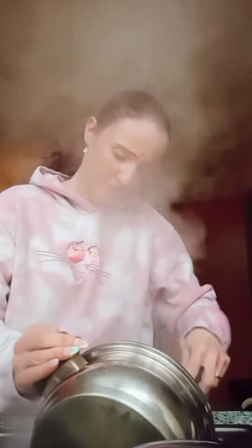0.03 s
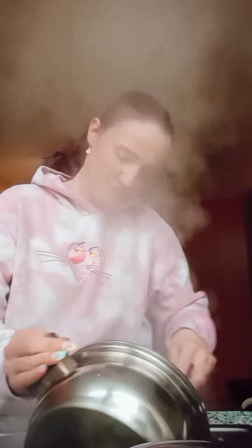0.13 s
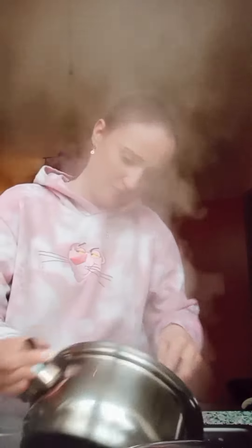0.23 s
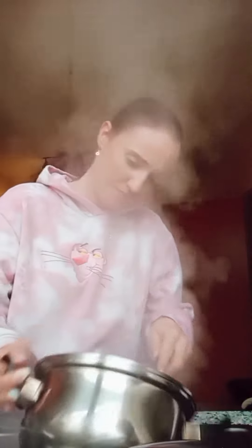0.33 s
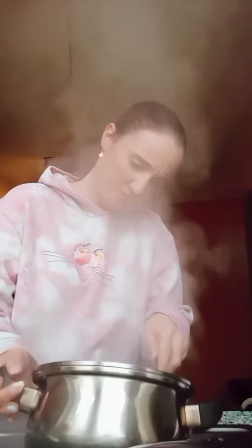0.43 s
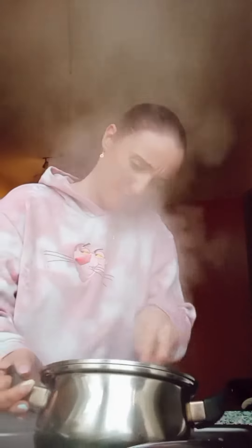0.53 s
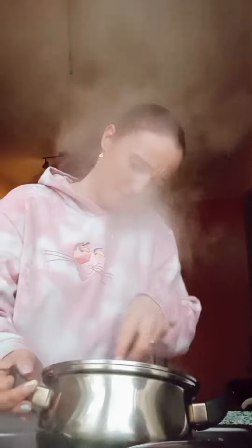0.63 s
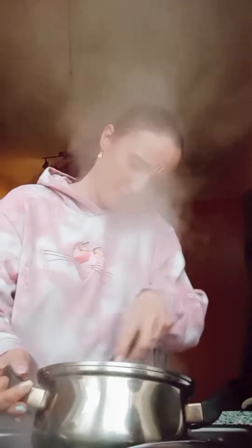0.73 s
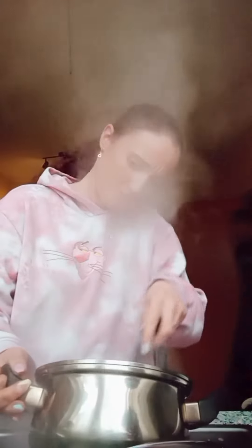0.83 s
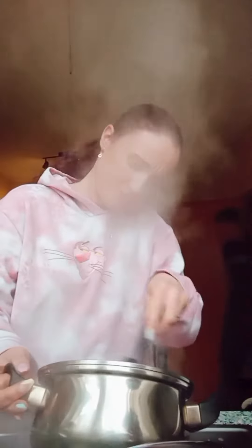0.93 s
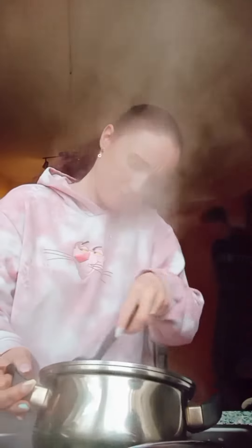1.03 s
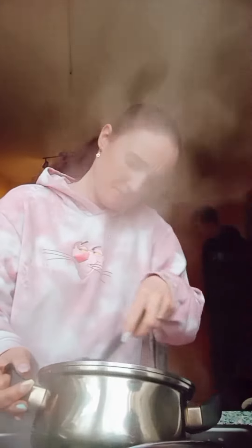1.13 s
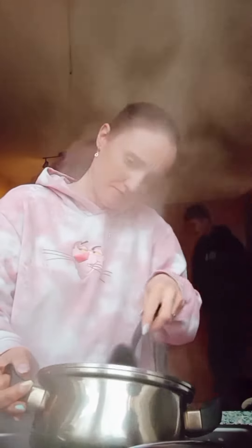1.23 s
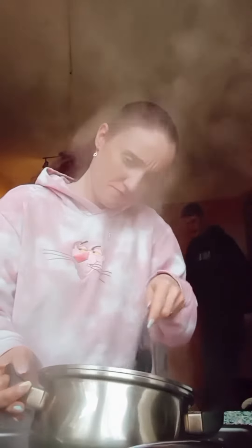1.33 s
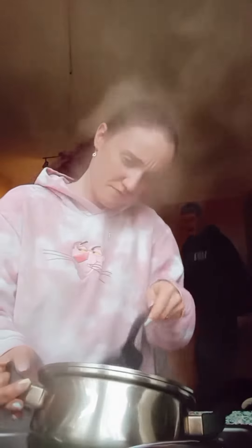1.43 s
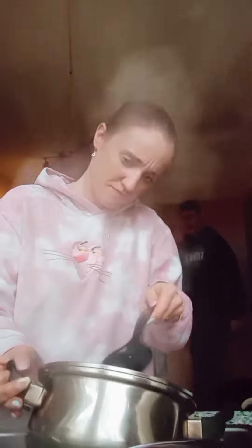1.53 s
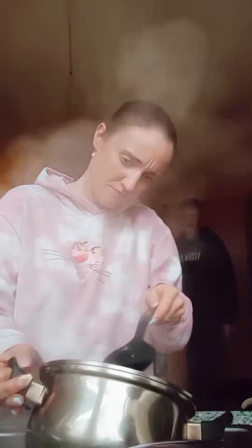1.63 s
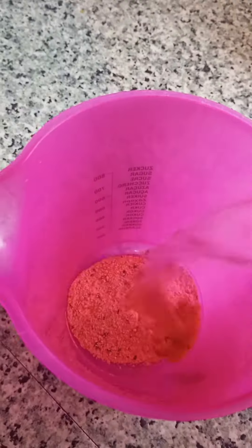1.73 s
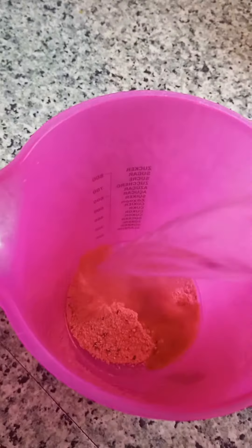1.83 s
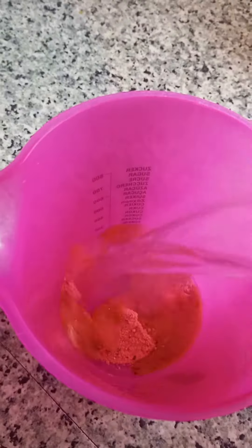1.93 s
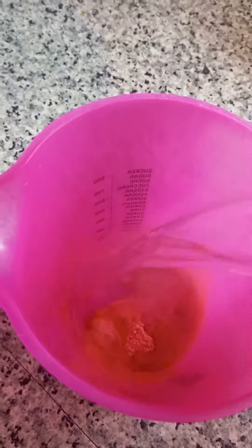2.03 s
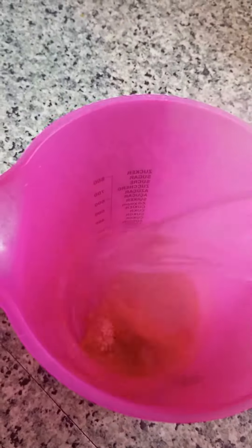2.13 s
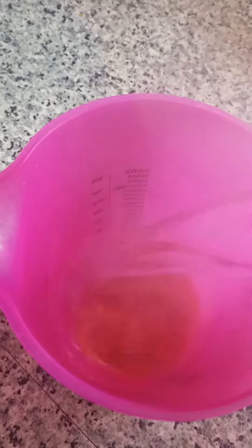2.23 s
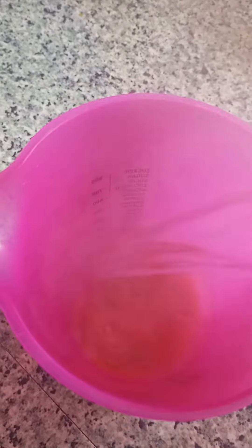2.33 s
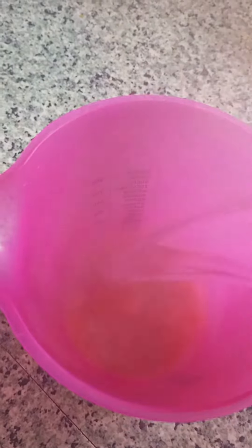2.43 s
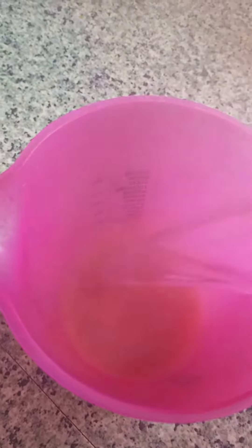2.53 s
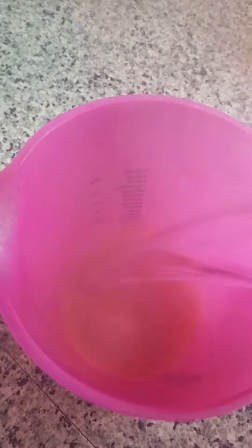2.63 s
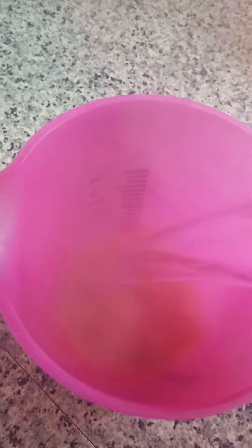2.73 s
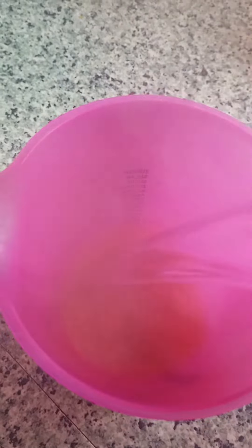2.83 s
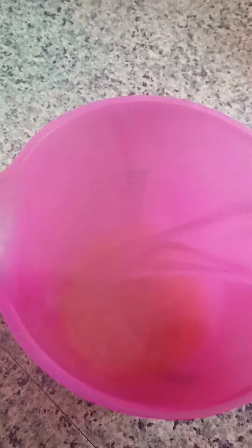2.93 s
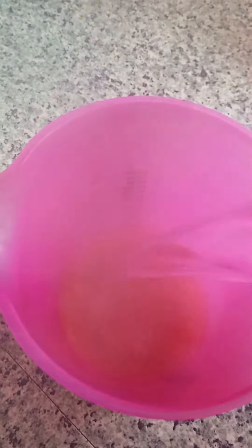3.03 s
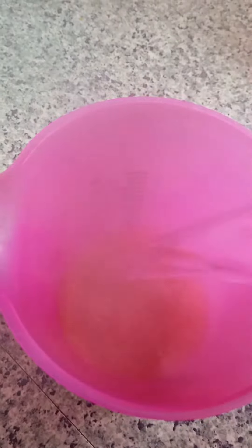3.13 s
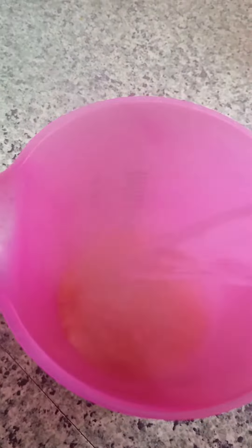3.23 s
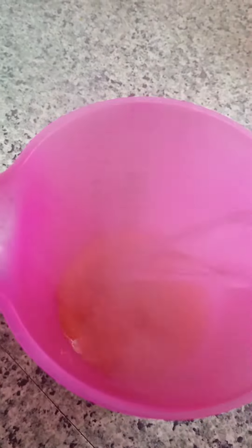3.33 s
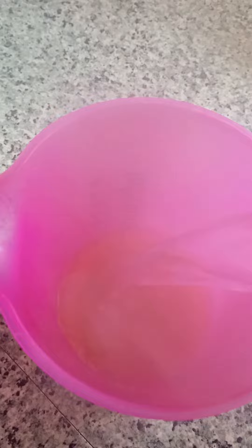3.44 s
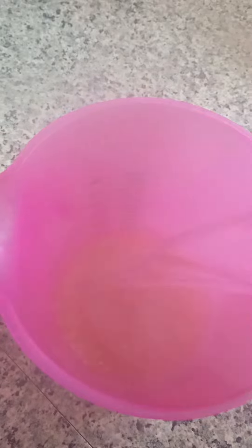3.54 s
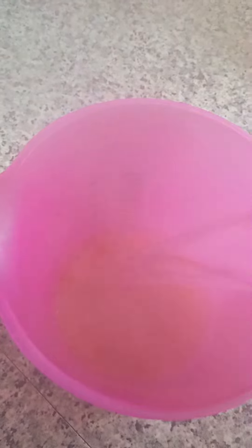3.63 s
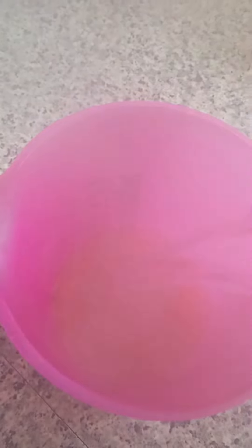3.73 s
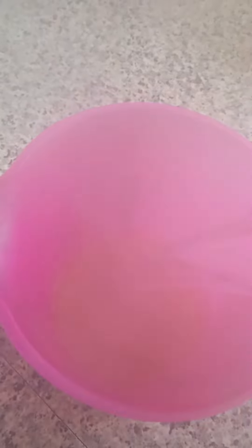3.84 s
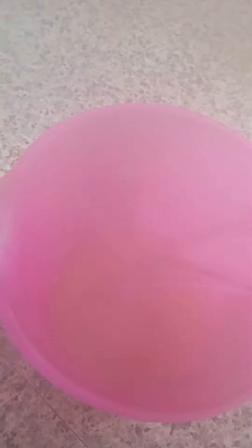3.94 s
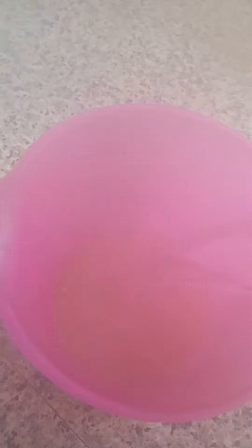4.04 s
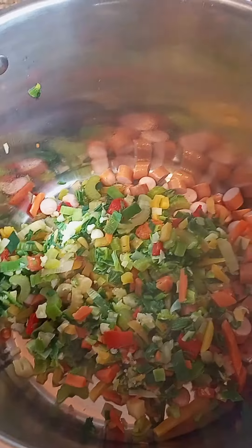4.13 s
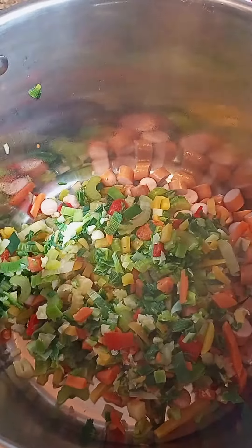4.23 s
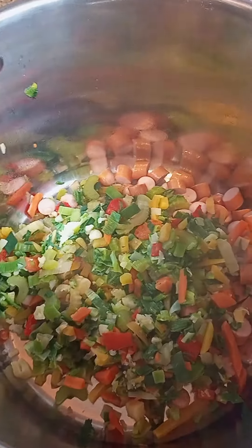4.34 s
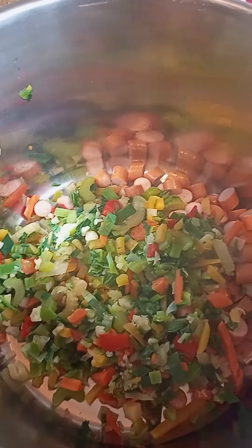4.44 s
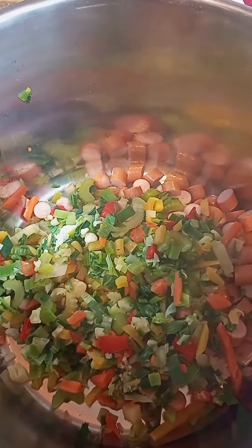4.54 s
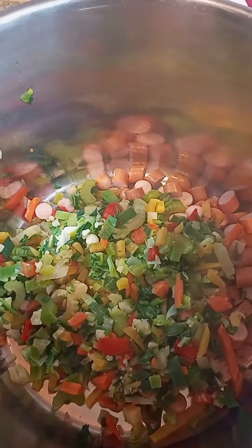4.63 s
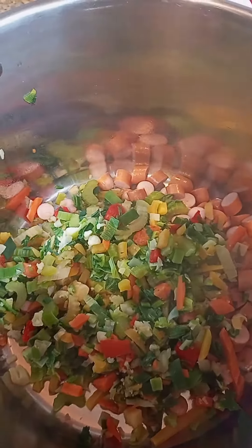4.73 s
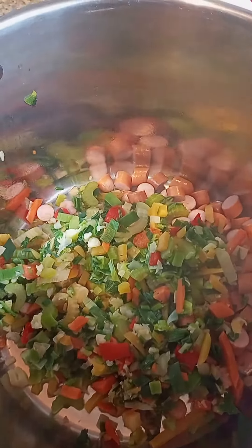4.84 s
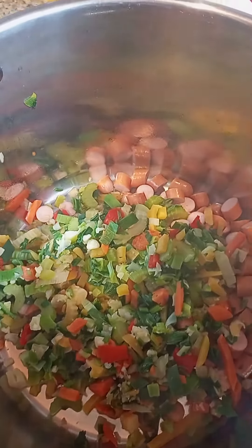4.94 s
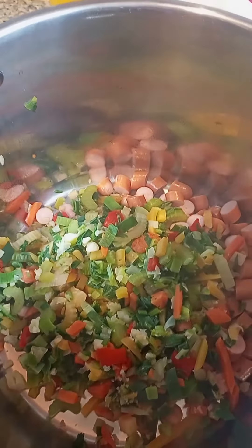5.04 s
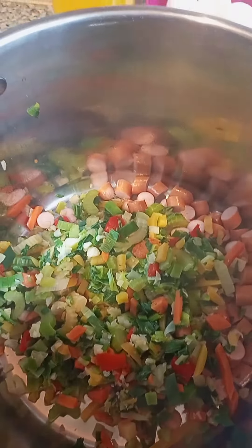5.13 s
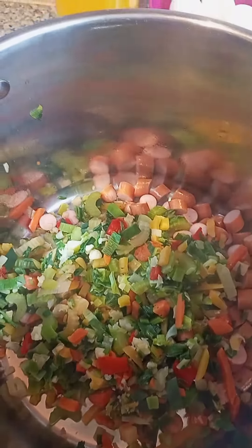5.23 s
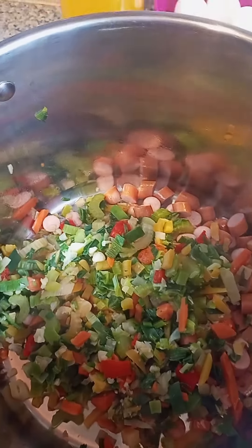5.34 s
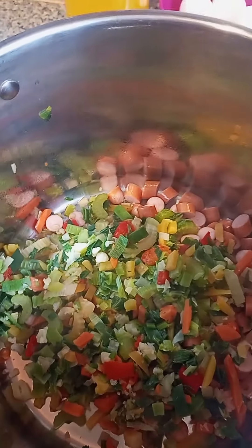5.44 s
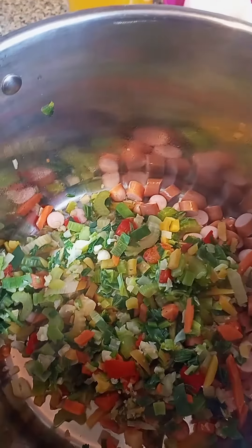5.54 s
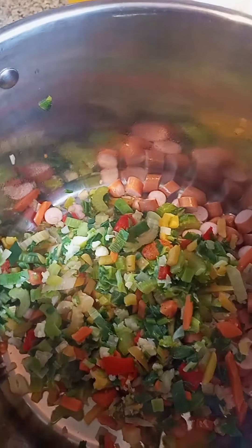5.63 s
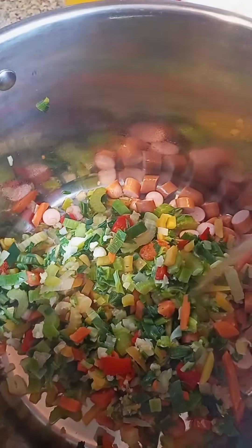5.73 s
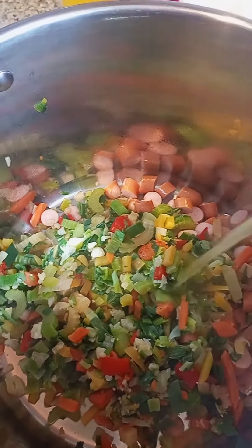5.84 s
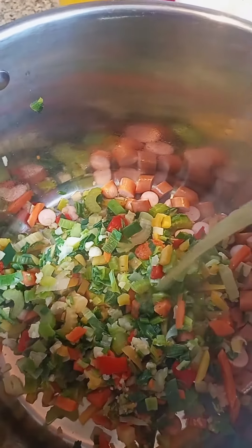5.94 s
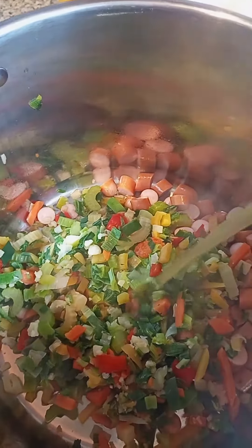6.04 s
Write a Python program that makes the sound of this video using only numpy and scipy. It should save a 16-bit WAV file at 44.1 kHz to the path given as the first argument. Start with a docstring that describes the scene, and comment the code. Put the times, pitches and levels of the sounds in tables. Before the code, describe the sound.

Steel pot scuffs and clanks onto a stove, a utensil rings its rim, water gurgles into a plastic jug, then a fluttering roar with simmering bubbles.

```python
"""Home kitchen in three shots

An extractor fan (coloured noise and a wavering hum) runs in each shot, with a brief silence between shots.
A steaming pot (hissing noise) scuffs and lands on the hob, then a utensil strikes it: ringing modes and cracks.
Hot water is poured onto powder in a plastic jug: bursts of clicks and rising bubble notes, glugs and drops.
Then a burner roars (fluttering noise) under a pot of vegetables, with simmering bubbles and a clicking sizzle.
"""
import sys
import numpy as np
from scipy import signal
from scipy.fft import rfft, irfft, next_fast_len
from scipy.io import wavfile
from scipy.ndimage import uniform_filter1d

SR = 44100
rng = np.random.default_rng(int(sys.argv[2]) if len(sys.argv) > 2 else 0)


def master_out(mix):
    """Clip the mix to full scale and print it as 16-bit PCM to the path in sys.argv[1]."""
    frames = np.transpose(np.atleast_2d(mix))
    ceiling = np.clip(frames, -1, 1)
    pcm = np.round(ceiling * 32767).astype(np.int16)
    wavfile.write(sys.argv[1], SR, pcm)


N = 268128
TIME = np.arange(N) / SR
SIZE = next_fast_len(N + SR, True)
FREQ = np.maximum(np.arange(SIZE // 2 + 1) * SR / SIZE, 1)
ROOM_T60_S = 0.47


def amp(db):
    """Decibels to gain."""
    return 10 ** (np.asarray(db) / 20)


def unit(x):
    """Scale to rms 1."""
    return x / np.sqrt(np.mean(x ** 2))


def noise():
    """White noise."""
    return rng.standard_normal(N)


def walk(rate):
    """Smooth random drift with rms 1, heading for a new value rate times a second."""
    k = max(int(SR / rate), 1)
    steps = np.repeat(rng.standard_normal(N // k + 1), k)
    return unit(uniform_filter1d(steps, k)[:N])


def colour(x, points, lifts=()):
    """Minimum-phase filter of unit power through (f/Hz, level/dB) points, with lifts (f/Hz, width/Hz, lift/dB)."""
    hz, db = np.transpose(points)
    db = np.interp(np.log(FREQ), np.log(hz), db)
    for f, width, lift in lifts:
        db = db + lift / (1 + (2 * (FREQ - f) / width) ** 2)
    # folding the cepstrum forward in time makes the filter causal
    cepstrum = irfft(np.log(unit(amp(db))), SIZE)
    cepstrum[1:SIZE // 2] *= 2
    cepstrum[SIZE // 2 + 1:] = 0
    return irfft(rfft(x, SIZE) * np.exp(rfft(cepstrum)), SIZE)[:N]


def resonate(x, modes):
    """Parallel resonant band-passes (f/Hz, width/Hz, level/dB)."""
    response = sum(amp(db) / (1 + 1j * (FREQ - f * f / FREQ) / width) for f, width, db in modes)
    return irfft(rfft(x, SIZE) * response, SIZE)[:N]


def fade(t60):
    """One second of exponential decay, falling 60 dB in t60 seconds."""
    return amp(-60 * TIME[:SR] / t60)


def ramp(start, length):
    """Rise from 0 to 1, beginning at start."""
    return np.clip((TIME - start) / length, 0, 1)


def swell(s, length):
    """A smooth bump centred on s."""
    return np.exp(-2 * ((TIME - s) / length) ** 2)


def envelope(events, attack, t60):
    """Level of (t/s, level/dB) events that each rise briefly and die away; overlaps add in power."""
    power = np.zeros(N)
    for s, db in events:
        decay = 1e-6 ** (np.maximum(TIME - s - attack, 0) / t60)
        power += (amp(db) * ramp(s, attack)) ** 2 * decay
    return np.sqrt(power)


def come_up(full_s, rise_db_per_s, sag_db_per_s):
    """Gain that climbs to 1 at full_s and then sags slowly."""
    early = np.maximum(full_s - TIME, 0)
    late = np.maximum(TIME - full_s, 0)
    return amp(-rise_db_per_s * early - sag_db_per_s * late)


def add(out, s, sound):
    """Mix a sound in at time s."""
    part = out[int(s * SR):][:len(sound)]
    part += sound[:len(part)]


def patter(rate, spread_db):
    """Random clicks of either sign, many small and a few big, with rms 1."""
    size = amp(spread_db * np.minimum(rng.exponential(size=N), np.pi + 1))
    return unit((rng.random(N) < rate / SR) * np.sign(noise()) * size)


def blips(rows, sag=0):
    """Short smooth tones (t/s, level/dB, f/Hz, length/s) whose pitch may sag, in octaves a second."""
    out = np.zeros(N)
    for s, db, hz, length in rows:
        age = TIME - s
        out += amp(db) * swell(s, length) * np.cos(2 * np.pi * hz * age * 2 ** (-sag * age / 2))
    return out


def room(x, wet_db, treble_db):
    """Adds the kitchen's diffuse tail: decaying noise with a quick build-up."""
    tail = rng.standard_normal(SR) * fade(ROOM_T60_S) * (1 - fade(0.016))
    wet = signal.fftconvolve(x, tail / np.linalg.norm(tail))[:N]
    return x + amp(wet_db) * colour(wet, [(3000, 0.016), (11000, treble_db)])


def fan(hum_db):
    """Low rush of air with a hum that wavers in pitch."""
    # extractor fan and room: f/Hz, relative level/dB
    fan_colour = [(25, -31.5), (50, -10.5), (70, -1.5), (104, 5), (130, -2), (200, -7.5), (295, -1),
                  (470, -13), (1150, -16.5), (1900, -28.5), (5000, -45), (9000, -60)]
    hum = np.sin(2 * np.pi * np.cumsum(104 * (1 + 0.033 * walk(18))) / SR)
    rush = colour(noise(), fan_colour) * amp(walk(12))
    return amp(-43) * rush + amp(hum_db) * hum


def pot():
    """The pot scuffs, knocks, squeaks and lands with a bounce; then a utensil strikes its rim."""
    # pot meeting the hob: t/s, relative level/dB
    pot_blows = [(.596, 4.5), (.5975, -4), (.6225, -6), (.631, -6)]
    # its damped base: f/Hz, relative level/dB, t60/s
    pot_modes = [(523, -10, 0.4), (654, -11, 0.088), (762, -3, 0.17), (910, -11.5, 0.023), (1324, -8, 0.2),
                 (2380, -11, 0.33), (2530, -6, 0.11), (3440, 0, 0.071), (5910, 1, 0.017),
                 (6140, -9.5, .018)]
    # landing's contact noise: f/Hz, relative level/dB
    pot_crack = [(100, -11.5), (300, -12.5), (520, 1.5), (900, -2), (1900, -11.5), (2600, -9.5),
                 (4400, -15), (5900, -10.5), (7200, -15.5), (7900, -22.5), (9800, -16.5), (13500, -37)]
    # utensil on the steel rim: t/s, relative level/dB
    rim_blows = [(1.1095, 0.5), (1.1122, 2.5)]
    # the rim's damped clack, then its long ring: f/Hz, relative level/dB, t60/s
    rim_modes = [(520, -16, .06), (1010, -13, .06), (1345, -7, .05), (1710, -3, .04), (2630, 3, .04),
                 (3110, -5, .04), (3500, -2, .035), (1346, -11, .42), (1830, -18, .42), (2073, -15, .38),
                 (2108, -5.5, .34), (2450, -15, .35), (2510, -14, .4), (2659, -14, .33), (2750, -15, .4),
                 (3490, -20, .38)]
    # utensil's contact noise: f/Hz, relative level/dB
    rim_crack = [(150, -55), (500, -8), (950, -10.5), (1350, -1.5), (1560, -15), (1720, -2), (2150, -11.5),
                 (2600, -4), (3500, -7), (4500, -15), (6500, -9.5), (7800, -21.5), (9500, -13.5),
                 (13500, -34.5)]
    # pot and hand scuffing on the hob: t/s, level/dB, length/s
    scuff_moments = [(0.066, -44.5, 0.024), (0.44, -44.5, 0.016), (0.905, -40.5, 0.04),
                     (0.907, -38.5, 0.005), (1.485, -48, 0.035), (1.59, -48, 0.02)]
    # tone of the rubbing: f/Hz, relative level/dB
    scuff_colour = [(150, -17), (400, -3.5), (800, -1), (1250, -5), (1700, -13), (3000, -20.5), (5000, -42),
                    (14000, -51.5)]
    # soft knocks of handling: t/s, level/dB, f/Hz, length/s
    knocks = [(0.075, -40.5, 1300, 0.013), (.062, -35, 380, 0.016), (.44, -41.5, 1270, 0.011),
              (1.592, -39.5, 1050, 0.016), (1.082, -31, 81, 0.011)]
    # steel squeaks as the pot tilts: t/s, level/dB, f/Hz, length/s
    squeaks = [(.126, -46.5, 2593, 0.037)]

    landing = clank(pot_blows, pot_modes, pot_crack, ring_db=-16.0, crack_db=-16.0, crack_t60=0.033,
                    tail_db=-16.5)
    strike = clank(rim_blows, rim_modes, rim_crack, ring_db=-11.5, crack_db=-15.5, crack_t60=0.02,
                   tail_db=-17.5)
    sliding = amp(-55 + 3.9 * walk(25))
    rubbing = sliding + sum(amp(db) * swell(s, length) for s, db, length in scuff_moments)
    scuffs = colour(patter(rate=2200, spread_db=2) * rubbing, scuff_colour)
    squeaking = blips(squeaks, sag=1.7) * amp(2 * walk(200))
    handling = scuffs + blips(knocks) + squeaking
    return landing + strike + room(handling, wet_db=-5.5, treble_db=-3.5)


def clank(blows, modes, crack_colour, ring_db, crack_db, crack_t60, tail_db):
    """The hardest blow rings the steel, roughened by rattling; every contact cracks and fills the room."""
    hardest = max(blows, key=lambda blow: blow[1])[0]
    ring = np.zeros(N)
    for k, (hz, db, t60) in enumerate(modes):
        add(ring, hardest, (-1) ** k * amp(db) * mode(hz, t60))
    rattle = amp(2.4 * walk(150) * ramp(hardest, .03))
    ring = room(ring * rattle, wet_db=-13, treble_db=-4)
    crack = noise() * envelope(blows, 1 / SR, crack_t60)
    tail = colour(noise(), [(3000, 0), (11000, -8)]) * envelope(blows, .01, ROOM_T60_S)
    return amp(ring_db) * ring + amp(crack_db) * colour(crack + amp(tail_db) * tail, crack_colour)


def mode(hz, t60):
    """A short mode of the steel just decays; a long one builds up and beats with a close twin."""
    turn = 2 * np.pi * TIME[:SR]
    if t60 < .2:
        return fade(t60) * np.sin(hz * turn)
    twin_hz = hz + 30 * rng.choice([-1, 1]) * rng.uniform(0.42, 1)
    pair = np.sin(hz * turn) + amp(-10) * np.sin(twin_hz * turn)
    return fade(t60) * (1 - fade(t60)) * pair


def steam():
    """A soft, faint hiss from the hot pot, swelling in puffs."""
    # puffs of steam: t/s, level/dB
    puffs = [(.03, -57), (.215, -50), (.45, -59), (.89, -50.5), (1.485, -57.5)]
    # hiss: f/Hz, relative level/dB
    steam_colour = [(800, -12.5), (2000, 0.5), (3500, 8.5), (4600, 1.5), (6200, 2.5), (7800, -8.5),
                    (10000, -2.5), (12000, -12), (14000, -21)]
    level = np.hypot(amp(-62.5), envelope(puffs, attack=0.017, t60=.7))
    return level * amp(1.0 * walk(27)) * colour(noise(), steam_colour)


def pour():
    """The stream breaks into bursts of droplets and churns up bubbles that ring in the jug."""
    # All levels here are ahead of the pour's final trim and tone.
    # splashes thrown up the jug's wall: t/s, level/dB
    splashes = [(1.86, -43.5), (2.205, -46), (3.275, -39.5), (3.925, -42)]
    # droplets: f/Hz, relative level/dB
    spatter_colour = [(400, -12), (1200, -10.5), (1700, 6.5), (2100, -2.5), (2700, 1.5), (3100, -5.5),
                      (4000, -2), (6000, -44), (7500, -33.5)]
    # fine spray: f/Hz, relative level/dB
    spray_colour = [(1500, -7), (3100, -10.5), (3850, 7.5), (4500, 3), (5600, -2), (6300, -1.5),
                    (14000, -22.5)]
    # air in the jug: f/Hz, width/Hz, relative level/dB
    jug_air = [(268.5, 32, 3.5), (359, 57, -2.5), (616, 135, 1.5), (887, 32, 2)]
    # the jug's higher resonances: f/Hz, width/Hz, lift/dB
    jug_upper = [(2210, 110, 10.5), (2390, 77, 9)]
    # low gulps of big air pockets once the jug is deep: t/s, level/dB
    gulps = [(3.866, -28), (3.889, -24.5), (3.92, -29), (3.961, -27.5), (3.986, -25), (4.045, -23.5)]
    # glugs, where the stream drags a cluster of bubbles under: t/s, level/dB, f/Hz, length/s
    glugs = [(1.81, -46.5, 858, .09), (2.085, -38, 876, .022), (2.204, -32, 863, .028),
             (2.569, -32.5, 802, 0.05), (2.715, -34.5, 900, 0.029), (2.834, -38, 612, .04),
             (2.917, -38, 676, .04), (3.093, -41.5, 603, 0.061), (3.225, -41.5, 786, 0.056),
             (3.318, -40.5, 613, .04), (3.377, -37, 830, .028), (3.502, -38.5, 327, .025),
             (3.763, -40.5, 790, 0.027), (3.877, -35.5, 884, 0.074)]
    # big drops slapping the plastic: t/s, peak level/dB, f/Hz, t60/s
    drops = [(2.057, -31.5, 4100, 0.021), (2.2079, -8, 2770, 0.006), (2.254, -20, 4000, 0.017),
             (2.37, -26, 3900, 0.014), (2.428, -22.5, 2400, 0.017), (2.443, -25, 2330, 0.018),
             (2.646, -26, 4370, 0.029), (2.758, -26, 1760, 0.046), (2.798, -21.5, 2080, 0.0073),
             (2.907, -20, 2470, 0.011), (2.979, -30, 4300, 0.013), (3.0154, -22.5, 2190, 0.018),
             (3.412, -33, 4200, .012), (4.073, -19, 1260, 0.0038)]
    # dull top of the whole pour: f/Hz, relative level/dB
    pour_top = [(5700, 2.5), (6400, -7), (7300, -22), (11000, -8.5), (14000, -31)]
    full_flow_s, deep_s = 2.4, 2.56

    # the stream swells to full flow and sags slowly; then the deepening water cushions it
    cushioned = amp(-40.5 - 7.5 * ramp(3.04, 0.17))
    stream = cushioned * come_up(full_flow_s, rise_db_per_s=34, sag_db_per_s=1.5)
    splashing = np.hypot(stream, envelope(splashes, attack=0.0079, t60=0.3))
    burst = amp(2.6 * np.tanh(walk(90)) + 1.8 * np.tanh(walk(22)))

    droplets = bubbles(rate=1100, low_hz=1100, high_hz=3400, cycles=6, glide=.03, spread_db=16)
    droplets += amp(-4) * patter(rate=1700, spread_db=3.3)
    spatter = unit(colour(droplets * burst, spatter_colour, jug_upper))

    mist = bubbles(rate=900, low_hz=3000, high_hz=6800, cycles=6, glide=.02, spread_db=20)
    mist += amp(1) * patter(rate=1300, spread_db=5)
    spray = unit(colour(mist * burst, spray_colour))
    # against the spatter, spray dies down as the water deepens; dry powder swallows it until wet
    spray_level = amp(-4.5 - 3.5 * (TIME - full_flow_s)) * ramp(1.863, 0.26)

    # churning starts in earnest once the water is deep enough to trap air
    churning = amp(np.where(TIME < deep_s, -51, -42.5))
    churn = unit(resonate(patter(rate=900, spread_db=2) * amp(4 * np.tanh(walk(35))), jug_air))
    notes = bubbles(rate=90, low_hz=540, high_hz=950, cycles=18, glide=.018, spread_db=12)
    gurgle_colour = [(120, -14.0), (300, 0.5), (1000, -3.5), (1400, -21.0), (5000, -8.5)]
    gurgle = unit(colour(churn + amp(-2.5) * notes, gurgle_colour))

    out = splashing * (spatter + spray_level * spray) + churning * gurgle
    out += blips([(s, db, 130, 0.0078) for s, db in gulps])
    for s, db, hz, length in glugs:
        # each glug also stirs deeper, larger bubbles
        body = amp(-7.5) * glug(294, length, cycles=4.4)
        add(out, s, amp(db) * (glug(hz, length, cycles=10.6) + body))
    for s, db, hz, t60 in drops:
        wobble = 1 + 0.18 * walk(3000)[:SR]
        add(out, s, amp(db) * fade(t60) * np.sin(2 * np.pi * np.cumsum(hz * wobble) / SR))
    return amp(-7.0) * colour(room(out, wet_db=-8.5, treble_db=-2.0), pour_top)


def bubble(hz, cycles, glide):
    """A damped note that rises as the bubble nears the surface."""
    age = TIME[:int(np.pi * SR * cycles / hz)] * hz / cycles
    return age * np.exp(-np.pi * age) * np.sin(2 * np.pi * cycles * age * (1 + glide * age))


def bubbles(rate, low_hz, high_hz, cycles, glide, spread_db):
    """Bubbles at random, a few much louder than the rest, with rms 1."""
    out = np.zeros(N)
    for when, pitch, size in rng.random((int(rate * N / SR), 3)):
        hz = low_hz * (high_hz / low_hz) ** pitch
        add(out, when * N / SR, amp(spread_db * size ** 3) * bubble(hz, cycles, glide))
    return unit(out)


def glug(hz, length, cycles, count=7):
    """A quick run of bubbles of about one size, with rms 1 over its length."""
    out = np.zeros(SR)
    for k in range(count):
        bubble_hz = hz * 2 ** (.11 * rng.standard_normal())
        add(out, length * (k + rng.random()) / count, bubble(bubble_hz, cycles, glide=0.017))
    return out / np.sqrt(np.sum(out ** 2) / (length * SR))


def burner():
    """A fluttering flame roar coloured by the air in the pot, with surges, throbs, a simmer and a sizzle."""
    # steady roar: f/Hz, relative level/dB
    flame_colour = [(60, -13.5), (130, 5.5), (250, 7.5), (370, -1), (520, 1), (900, -10), (1300, 6.5),
                    (1830, -3.5), (2100, -9), (3200, -17.5), (5800, -30.5), (7600, -58.5), (14000, -64)]
    # air in and under the pot: f/Hz, width/Hz, lift/dB
    pot_air = [(327, 80, 13), (448, 23, 15.5), (638.5, 31, 10), (1183, 9.6, 9), (1760, 56, 10),
               (2830, 200, 7), (3707, 210, 10.5), (4560, 240, 4.5)]
    # surges in the middle range of the roar: t/s, level/dB
    surges = [(4.5, -40.5), (4.61, -36), (4.71, -35), (4.915, -37), (5.318, -36.5), (5.61, -36.5),
              (5.711, -34), (5.87, -34.5)]
    # low throbs of the flame: t/s, level/dB, f/Hz, length/s
    throbs = [(4.445, -31, 184, 0.016), (5.29, -31.5, 107, 0.047), (5.705, -26, 326, 0.026)]
    # sizzle: f/Hz, relative level/dB
    sizzle_colour = [(1200, -20.5), (2300, 1), (3300, -7), (4900, -14.5), (7500, -46)]

    # the flame comes up, then burns almost evenly
    flame = amp(-32) * come_up(4.452, rise_db_per_s=50.5, sag_db_per_s=0.96)
    roar = colour(noise() * amp(1.3 * walk(35)), flame_colour, pot_air)

    swells = sum(amp(db) * swell(s, 0.062) for s, db in surges)
    surging = np.hypot(amp(-11) * flame, swells)
    surge_colour = [(300, -21.5), (600, -2.5), (820, 0.5), (1100, -1.5), (1700, -13.5), (7000, -65.0)]
    surge = colour(noise() * amp(3.73 * walk(50)), surge_colour, pot_air)

    simmer = bubbles(rate=63, low_hz=900, high_hz=1869, cycles=37.7, glide=0.023, spread_db=9.0)
    lumps = bubbles(rate=33, low_hz=148.2, high_hz=436, cycles=9, glide=0.025, spread_db=12)
    crackle = patter(rate=900, spread_db=3) * amp(2.5 * walk(28))
    sizzle = amp(-24.5) * unit(colour(crackle, sizzle_colour))

    steady = roar + amp(-9.5) * simmer + amp(-12) * lumps + sizzle
    return flame * steady + surging * (surge + sizzle) + blips(throbs)


def scene():
    """Each shot fades in and is cut off quickly; both channels are alike."""
    # shots: start t/s, end t/s, fade-in length/s, fan hum level/dB
    shots = [(0, 1.729, 0.00055, -56.5), (1.771, 4.163, 0.069, -47), (4.203, 6.08, 0.048, -43)]
    sources = (pot() + steam(), pour(), burner())
    out = np.zeros(N)
    for (start, end, rise, hum_db), source in zip(shots, sources):
        gate = ramp(start, rise) * np.clip((end - TIME) / 0.0037, 0, 1)
        out += gate * (source + fan(hum_db))
    return np.array([out, out])


def record(dry):
    """Soft saturation rounds the loudest peaks; a steep low-pass at 14 kHz cuts the top."""
    low_pass = signal.ellip(8, .2, 70, 14000, fs=SR, output="sos")
    return signal.sosfilt(low_pass, np.tanh(dry))


dry = scene()
out = record(dry)
master_out(out)
```